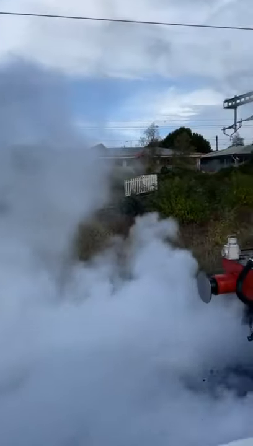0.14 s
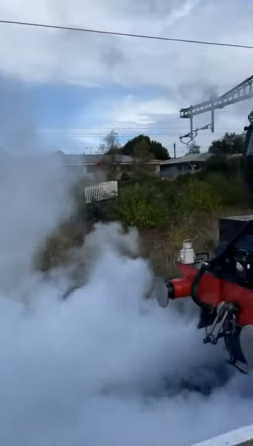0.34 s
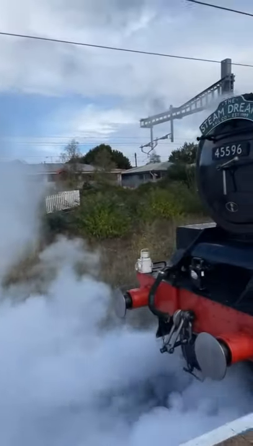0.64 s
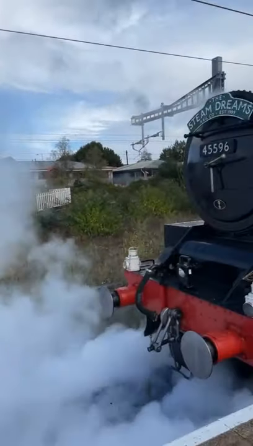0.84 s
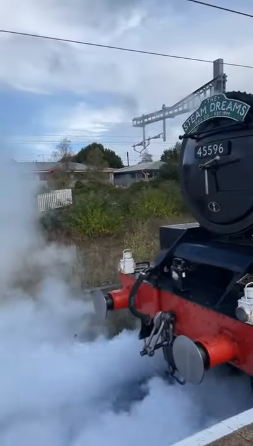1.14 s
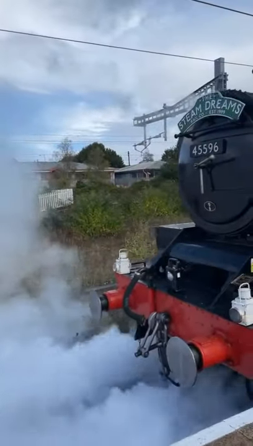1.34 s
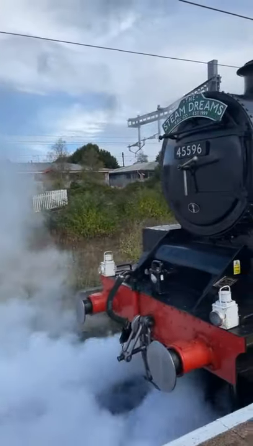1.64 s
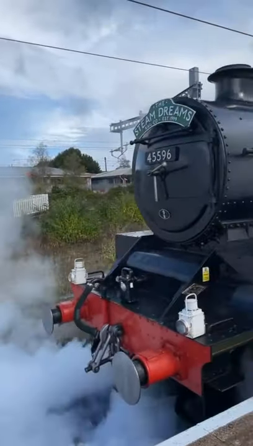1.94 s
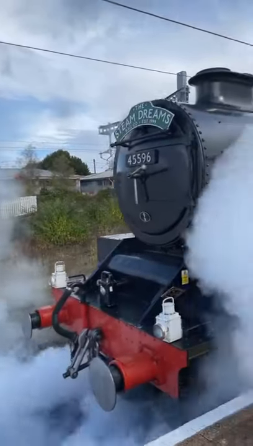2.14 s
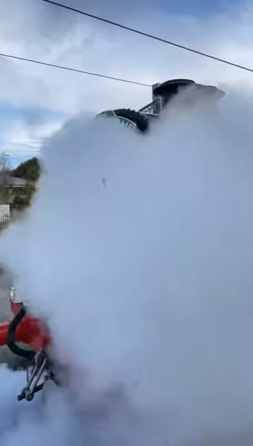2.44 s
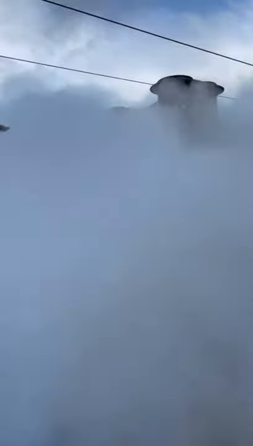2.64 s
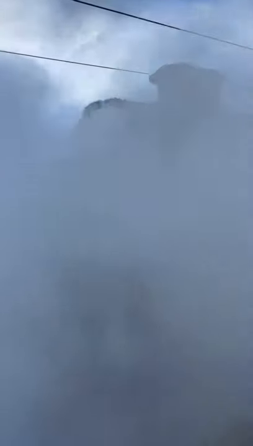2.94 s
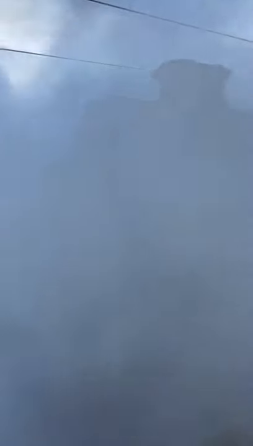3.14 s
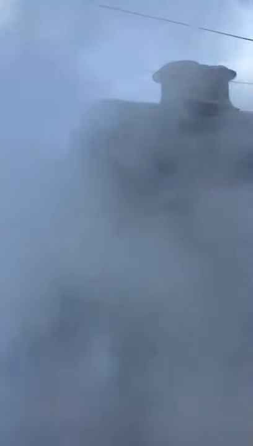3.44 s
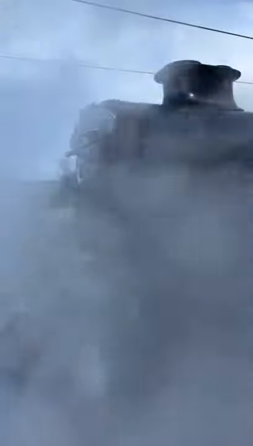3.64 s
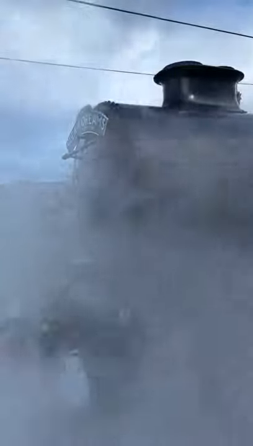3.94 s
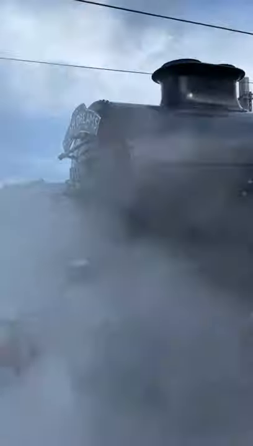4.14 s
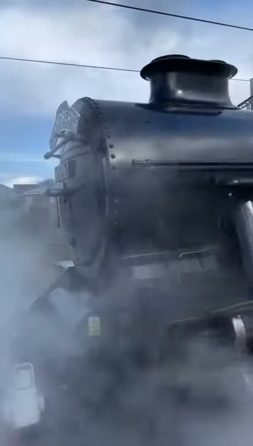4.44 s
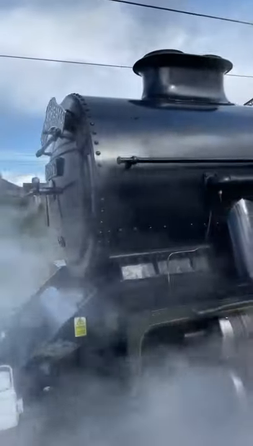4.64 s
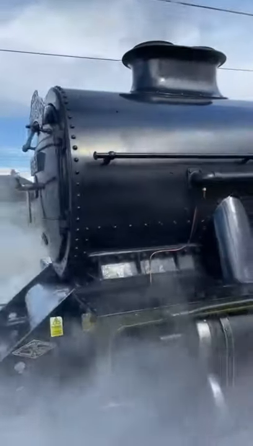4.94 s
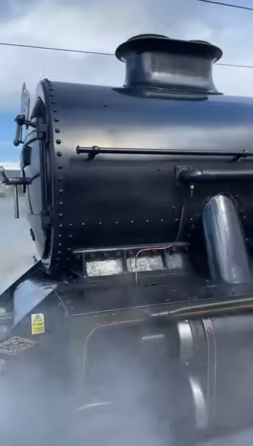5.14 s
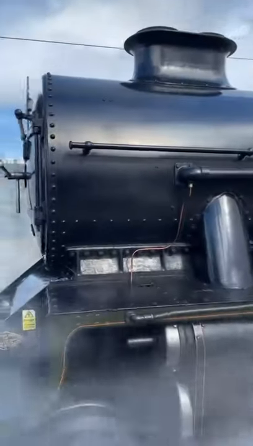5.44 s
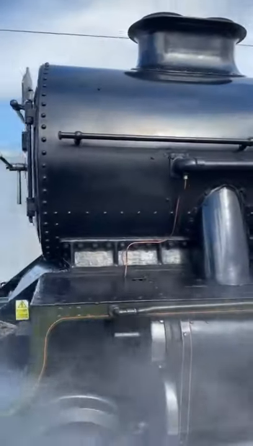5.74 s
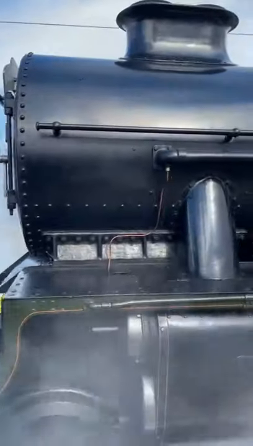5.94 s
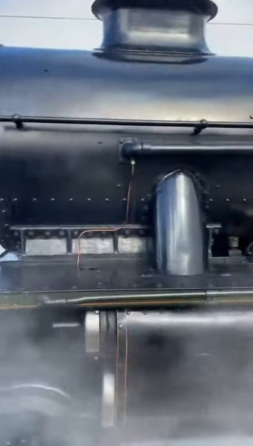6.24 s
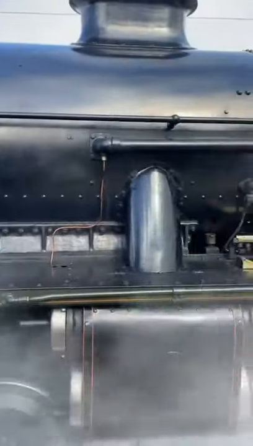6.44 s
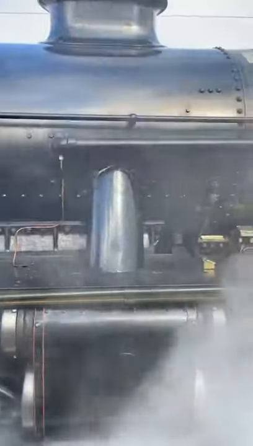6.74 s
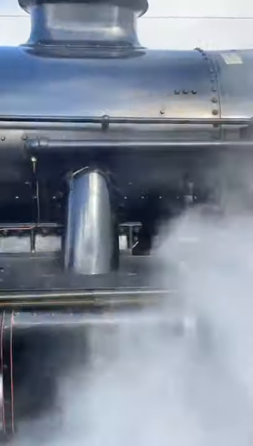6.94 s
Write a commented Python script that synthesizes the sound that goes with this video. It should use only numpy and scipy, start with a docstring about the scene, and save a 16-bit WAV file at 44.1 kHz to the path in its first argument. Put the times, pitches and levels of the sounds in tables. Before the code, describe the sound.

Beside a platform outdoors, a steam engine's open drains give a continuous, airy, bright hiss that swells and then sinks over three and a half seconds. A much louder blast snaps on with a hard thump, lasts two thirds of a second with more dull thumps, and stops abruptly. A very soft hiss remains, stepping up in the final seconds. Close, dry microphone with thin bass and no extreme treble.

```python
"""Beside a railway platform, a steam locomotive creeps past with its cylinder drains open.
The jets hiss and swell, a much louder blast with dull thumps cuts in for two thirds of a second,
then a far softer hiss steps back up. The jets and the low rumble beneath are shaped noise, the brief
hums are sines and the thumps are short high-passed pulses. The microphone chain delays the bass."""
import sys
import numpy as np
from scipy import signal
from scipy.fft import rfft, irfft, next_fast_len
from scipy.io import wavfile
from scipy.ndimage import uniform_filter1d

SR = 44100
rng = np.random.default_rng(int(sys.argv[2]) if len(sys.argv) > 2 else 0)


def to_wav(sig):
    """Store sig (one row per channel, or 1-D mono) as 16-bit WAV at the path in sys.argv[1].

    Samples outside -1..1 are clipped; the rate is SR.
    """
    pcm = np.clip(np.atleast_2d(sig), -1, 1) * 32767
    pcm = np.round(pcm).astype(np.int16)
    wavfile.write(sys.argv[1], SR, pcm.T)  # frames by channels


def elevation(decibels):
    """Turn decibel levels (scalar or array-like) into linear amplitude ratios."""
    levels = np.asarray(decibels, float)
    return 10 ** (levels / 20)


N = 313532
TIME = np.arange(N) / SR

# Jets before the blast, and after it: (time [s], hiss level [dB], brightness [dB per octave])
APPROACH_LEVELS = [(0, -29, -0.47), (.7, -27.5, -0.13), (1.35, -26.5, -0.5), (1.6, -25, 0.6),
                   (2.05, -26, -0.2), (2.5, -28.5, -.45), (2.8, -28, -0.16), (3.15, -29.5, -0.1),
                   (3.6, -32, -0.9)]
AFTER_LEVELS = [(4.4, -46.5, 0.54), (4.6, -46.5, 0.25), (4.93, -47.5, 0.4), (5.03, -38.5, 0.24),
                (6.0, -38.5, 0.05), (6.09, -39, 0), (6.18, -36.5, -.1), (6.5, -36.5, -.5), (6.9, -38, 0),
                (7.1, -40.5, 0.8)]
# Settled blast, to which the opening surge is added: (time [s], hiss level [dB], brightness [dB per octave])
BLAST_LEVELS = [(3.73, -17.5, -0.6), (3.81, -15, 0.5), (4.0, -15.5, 0.3), (4.08, -16.5, -0.1),
                (4.17, -15, 0.4), (4.27, -17, 0.5)]
# Relative colour of the jets in each stretch: (frequency [Hz], density [dB per Hz])
APPROACH_COLOUR = [(260, -49), (440, -22.5), (607, -12.5), (911, -14.5), (1190, -9.5), (1410, -11.5),
                   (2390, -6.5), (2790, -6), (10100, 0.5), (11200, -0.5), (11700, -2.5), (12500, -26.5),
                   (16200, -57), (22000, -120)]
BLAST_COLOUR = [(260, -51), (440, -23), (590, -13), (803, -16), (1190, -7.5), (1370, -10.5), (1860, -10.5),
                (2790, -6), (5320, -4), (8930, -2), (11500, -4), (12000, -13.5), (12500, -30), (16200, -55),
                (22000, -120)]
AFTER_COLOUR = [(260, -44), (440, -24), (479, -18.5), (550, -16.5), (651, -15.5), (911, -9.5), (1310, -8.5),
                (1550, -9.5), (1660, -7), (1910, -8.5), (2720, -3), (7040, -1), (11300, -1.5),
                (12000, -10.5), (12500, -23), (16200, -51), (22000, -120)]
# Relative colour of the rumble: (frequency [Hz], density [dB per Hz])
RUMBLE_COLOUR = [(24, -48), (40, -22), (72, -5.5), (130, -7), (216, 0), (318, -2.5), (460, -8),
                 (600, -32.5), (1010, -120)]
# Brief swells of the rumble: (time [s], half length [s], gain [dB])
RUMBLE_SWELLS = [(3.466, .07, 2.5), (6.0, .1, 4), (7.1, 0.11, 6)]
# Faint low tones: (start [s], length [s], frequency [Hz], rms level at the height of the swell [dB])
HUM_TONES = [(3.39, .15, 183, -58), (5.89, .1, 325, -67), (5.9, .14, 472, -65), (7.02, .16, 177, -65)]
# Echo off the ground as the engine draws near: (time [s], delay [ms], treble share of direct sound [0-1])
GROUND_ECHO = [(0, 0.55, 0.14), (1.8, 0.56, 0.26), (2.3, 0.74, .02)]
# Dull thumps: (time [s], peak level before the high-pass [dB], length [ms], high-pass corner [Hz])
THUMPS = [(3.6808, -1.5, 2.4, 193), (3.7718, -19.2, 3.9, 5), (3.9012, -24, 1.5, 30),
          (4.0001, -15.3, 2.7, 39), (4.0353, -22.5, 2.6, 33), (4.359, -13.9, 2.3, 101)]
# Bands that stand out for a while and glide:
# (time [s], half length [s], start frequency [Hz], end frequency [Hz], gain [dB])
HISS_BANDS = [(.3, 0.45, 1750, 1700, 2), (.4, 0.5, 2510, 2850, 3), (.71, 0.69, 2100, 2080, 3.5),
              (.78, 0.94, 1550, 1580, 5), (1.8, 0.086, 3680, 3740, 0.5), (2.14, .74, 2500, 1970, 3.5),
              (2.41, .084, 613, 660, 11), (2.67, .2, 3120, 3130, 6.5), (3.306, 0.41, 6370, 6760, 4.5),
              (4.6, 0.14, 2280, 2000, 6.5), (4.9, 0.31, 2950, 3080, 3.5), (6.25, .14, 2650, 3300, 1.5),
              (6.55, 0.38, 3280, 3200, 3)]


def read(points, hz):
    """Logarithmic frequency scale: joins the points of a spectrum by straight lines on it."""
    f, value = np.transpose(points)
    return np.interp(np.log(hz + 1), np.log(f + 1), value)


def evened(x):
    """Mean-square normalisation: scales a signal to rms 1."""
    return x / np.sqrt(np.mean(x ** 2) + 1e-20)


def smoothed_noise(noise, bins, frames):
    """Moving average: correlates noise over neighbouring bins and frames, at rms 1."""
    across_pitch = uniform_filter1d(noise, size=bins, axis=0)
    return evened(uniform_filter1d(across_pitch, size=frames, axis=1))


def turbulence(field_db, patchy_db, flicker_db, streaky_db, size=1024):
    """Turbulent flow noise: random short-time spectra with patches, long thin streaks and shared flicker."""
    frames, bins = 4 * N // size + 6, size // 2 + 1
    real, imaginary, patches, streaks = rng.standard_normal((frames, bins, 4)).T
    hz = np.fft.rfftfreq(size, 1 / SR)[:, None]
    t = np.arange(frames) * size / 4 / SR
    patches = smoothed_noise(patches, bins=16, frames=14)
    streaks = smoothed_noise(streaks, bins=2, frames=26)
    streaks /= np.sqrt(1 + (hz / 3500) ** 2)  # scattered reflections lose their pattern in the treble
    flicker = evened(uniform_filter1d(rng.standard_normal(frames), size=5))
    field = elevation(field_db(hz, t))
    field /= np.sqrt((field ** 2).mean(0))  # colour only: every moment equally loud
    texture = elevation(patchy_db * patches + streaky_db * streaks + flicker_db * flicker)
    spectra = (real + 1j * imaginary) * field * texture
    noise = signal.istft(spectra, nperseg=size, noverlap=3 * size // 4)[1]
    return evened(noise[:N])


def ground_comb_db(hz, t):
    """Interference: the delayed ground echo adds to the direct sound and combs its spectrum."""
    s, delay_ms, share = np.transpose(GROUND_ECHO)
    phase = np.exp(-2j * np.pi * hz * np.interp(t, s, delay_ms) / 1000)
    treble_weight = hz ** 2 / (hz ** 2 + 3500 ** 2)  # the echo is weak in the bass
    return 20 * np.log10(abs(1 + np.interp(t, s, share) * phase * treble_weight))


def passing_bands_db(hz, t):
    """Resonance curves: narrow bands swell, glide in frequency and fade."""
    half_width = 0.052  # share of the start frequency
    total_db = 0
    for s, half_length, from_hz, to_hz, db in HISS_BANDS:
        u = (t - s) / half_length
        centre = from_hz + (to_hz - from_hz) * (u + 1) / 2
        profile = 1 / (1 + ((hz - centre) / (half_width * from_hz)) ** 2)
        total_db = total_db + db * np.exp(-u ** 4) * profile
    return total_db


def jet(levels, colour, patchy_db, flicker_db, streaky_db):
    """Jet noise: escaping steam is turbulence that tilts brighter or duller about 4 kHz."""
    s, level_db, brightness = np.transpose(levels)

    def field_db(hz, t):
        """Spectral tilt: adds brightness per octave, ground comb and passing bands to the colour."""
        tilt_db = np.interp(t, s, brightness) * np.log2(hz / 4000 + .1)
        return read(colour, hz) + tilt_db + ground_comb_db(hz, t) + passing_bands_db(hz, t)

    return elevation(np.interp(TIME, s, level_db)) * turbulence(field_db, patchy_db, flicker_db, streaky_db)


def rumble(opened, shut):
    """Low-frequency noise: the lumpy roar of steam and rolling wheels."""
    roar = turbulence(lambda hz, t: read(RUMBLE_COLOUR, hz) + 0 * t,
                      patchy_db=0.5, flicker_db=1.2, streaky_db=2.0, size=2048)
    s, hiss_db, _ = np.transpose(AFTER_LEVELS)
    approach = elevation(-58 - 0.63 * TIME)  # sags by 0.63 dB per second
    blast = elevation(-43.5)
    later = elevation(np.interp(TIME, s, hiss_db) - 30)  # follows the hiss, 30 dB under it
    level = (1 - opened) * approach + opened * (1 - shut) * blast + shut * later
    swell_db = sum(db * np.exp(-((TIME - s) / half_length) ** 2) for s, half_length, db in RUMBLE_SWELLS)
    return roar * level * elevation(swell_db)


def hums():
    """Simple harmonic tones: faint sines that swell and fade."""
    out = np.zeros(N)
    for s, length, hz, db in HUM_TONES:
        envelope = np.sin(np.pi * np.clip((TIME - s) / length, 0, 1)) ** .5
        tone = np.sin(2 * np.pi * (hz * TIME + rng.random()))
        out += elevation(db) * np.sqrt(2) * envelope * tone
    return out


def thumps():
    """High-passed pulses: smooth humps, each followed by a slight dip."""
    out = np.zeros(N)
    for s, db, length_ms, corner_hz in THUMPS:
        across = np.clip((TIME - s) * 2 * 1000 / length_ms, -1, 1)  # -1 to 1 over the length
        hump = elevation(db) * np.cos(np.pi / 2 * across) ** 2
        out += signal.lfilter([1, -1], [1, -np.exp(-2 * np.pi * corner_hz / SR)], hump)
    return out


def ramp(middle_s, length_s):
    """Linear transition: rises from 0 to 1 about a given time."""
    return np.clip((TIME - middle_s) / length_s + .5, 0, 1)


def scene():
    """Superposition: the jets of three stretches, switched by the edges of the blast, plus the rest."""
    opens_s = 3.6786
    opened, shut = ramp(opens_s, length_s=.001), ramp(4.357, length_s=.008)
    # the first rush overshoots by 8 dB and dies away
    surge = elevation(8 * np.exp(-abs(TIME - opens_s) / 0.021))
    before = jet(APPROACH_LEVELS, APPROACH_COLOUR, patchy_db=0.29, flicker_db=0.32, streaky_db=2.5)
    during = jet(BLAST_LEVELS, BLAST_COLOUR, patchy_db=0.5, flicker_db=0.63, streaky_db=2.0) * surge
    later = jet(AFTER_LEVELS, AFTER_COLOUR, patchy_db=0.22, flicker_db=0.65, streaky_db=3.0)
    steam = (1 - opened) * before + (opened * (1 - shut)) ** 2 * during + shut * later
    mix = steam + rumble(opened, shut) + hums() + thumps()
    return mix[None]


def low_pass(x):
    """Removes everything above the highest recorded frequency."""
    return signal.sosfilt(signal.butter(12, 12780, fs=SR, output="sos"), x)


def record(dry):
    """Phase dispersion: a chain of phase shifters holds each pitch back by the same count of cycles."""
    size = next_fast_len(N + SR)
    hz = np.fft.rfftfreq(size, 1 / SR) + 1  # 1 Hz up, to keep the logarithm finite
    lag = np.exp(-2j * np.pi * 1.23 * np.log(hz / 1500))  # 1.23 cycles: thumps fall as chirps
    bass_cut = 1 / np.sqrt(1 + (58 / hz) ** 6)
    treble_cut = 1 / (1 + np.exp(np.clip((hz - 12250) / 70, -50, 50)))
    spectrum = rfft(dry, size) * lag * bass_cut * treble_cut
    mix = irfft(spectrum, size)[:, :N]
    return low_pass(mix)


dry = scene()
out = record(dry)
to_wav(out)
```